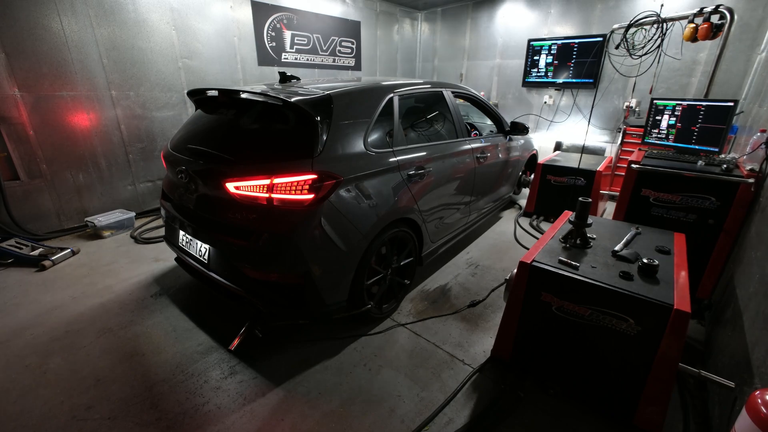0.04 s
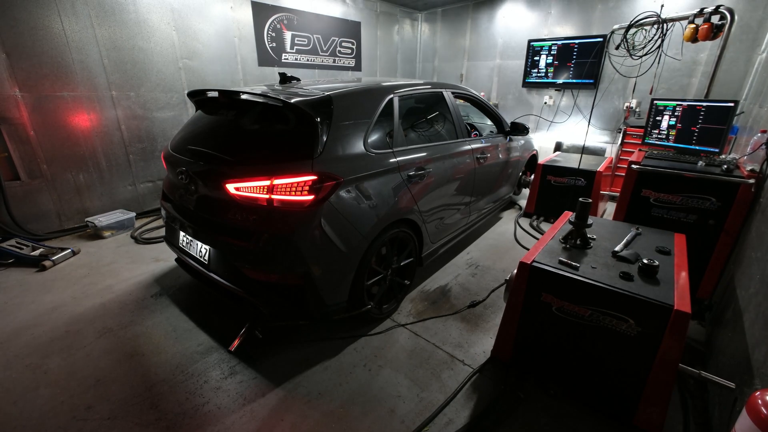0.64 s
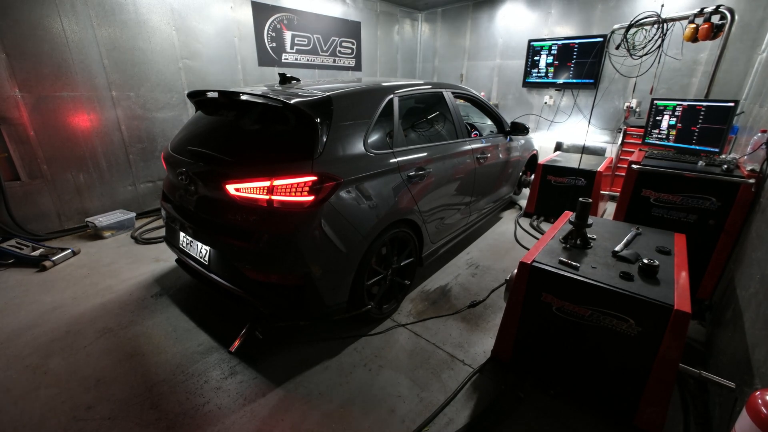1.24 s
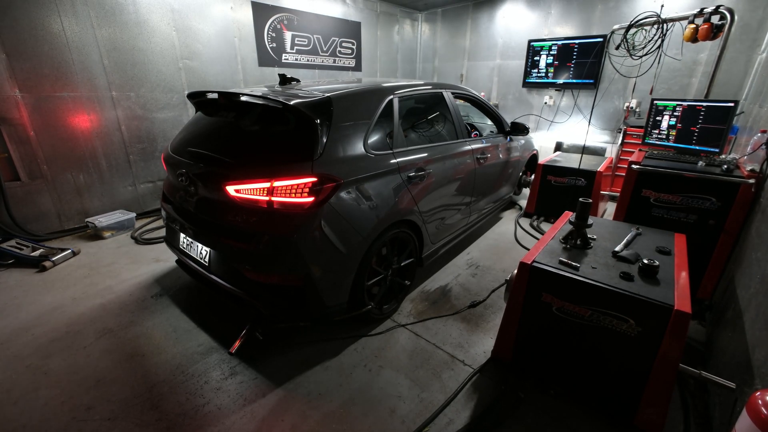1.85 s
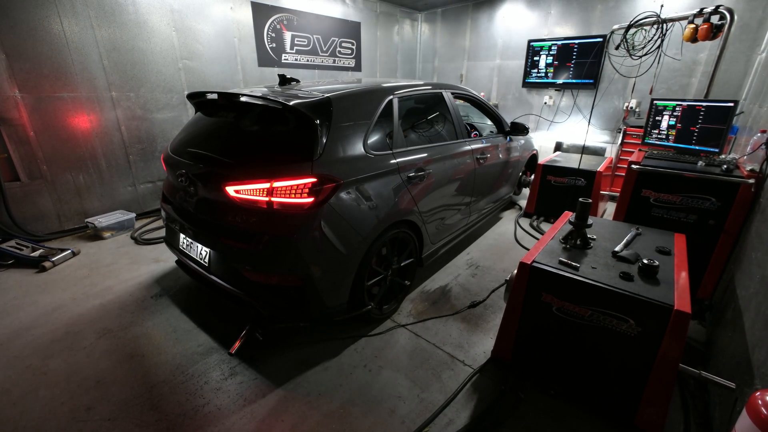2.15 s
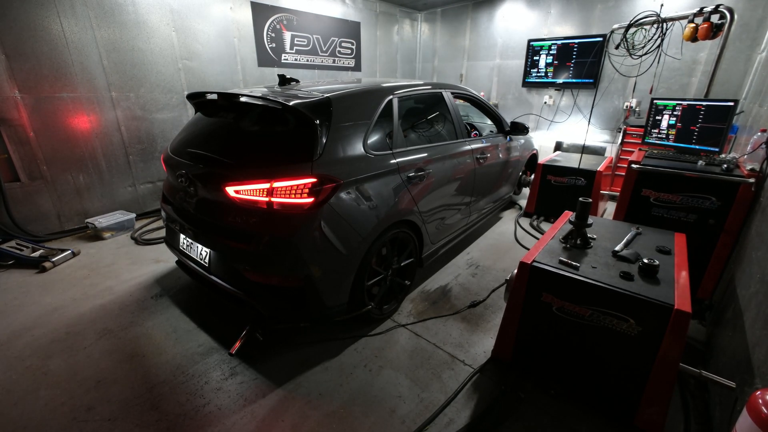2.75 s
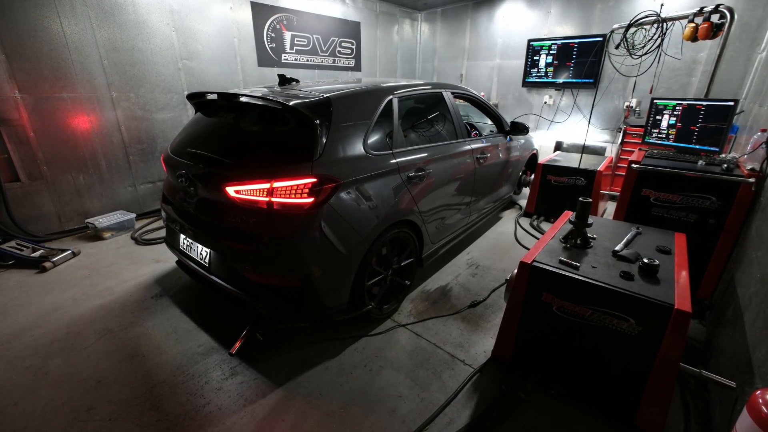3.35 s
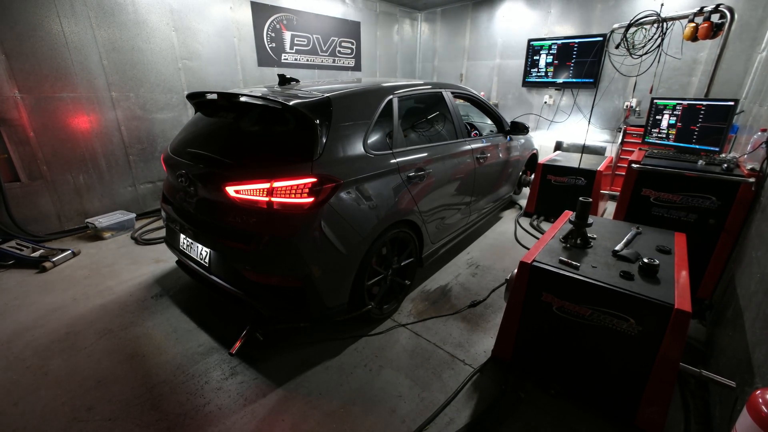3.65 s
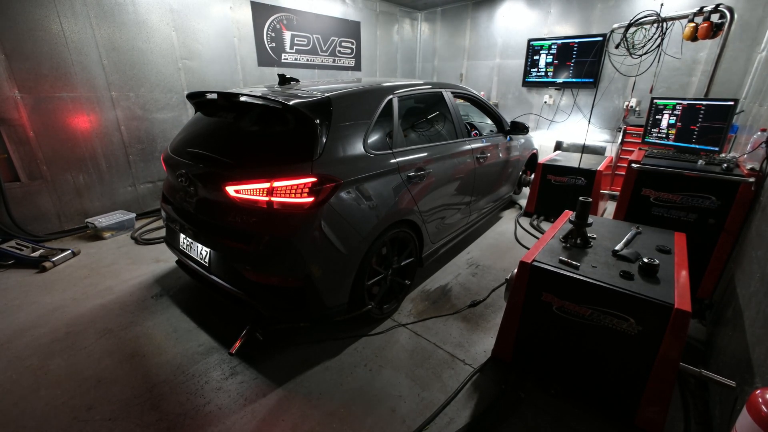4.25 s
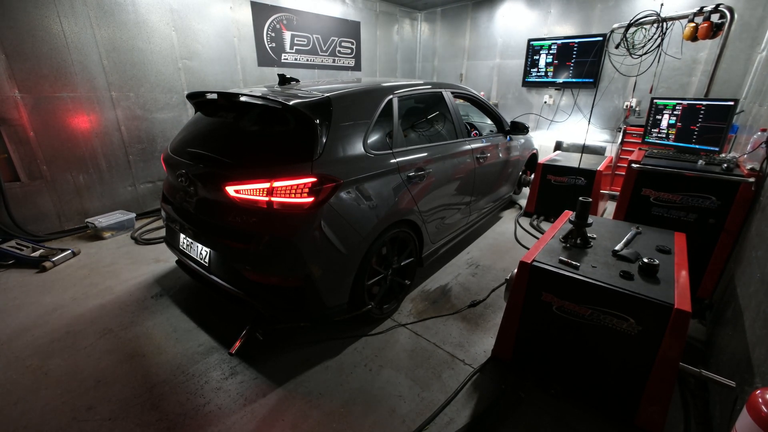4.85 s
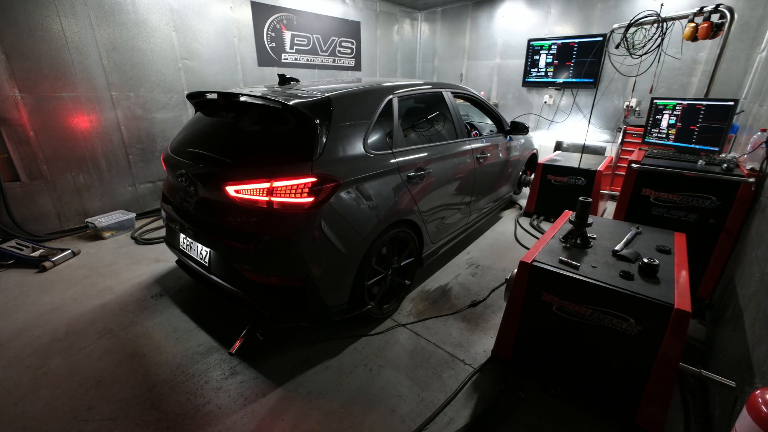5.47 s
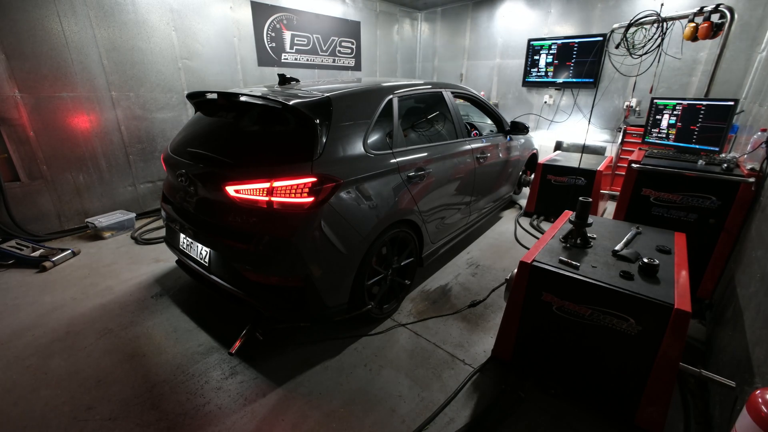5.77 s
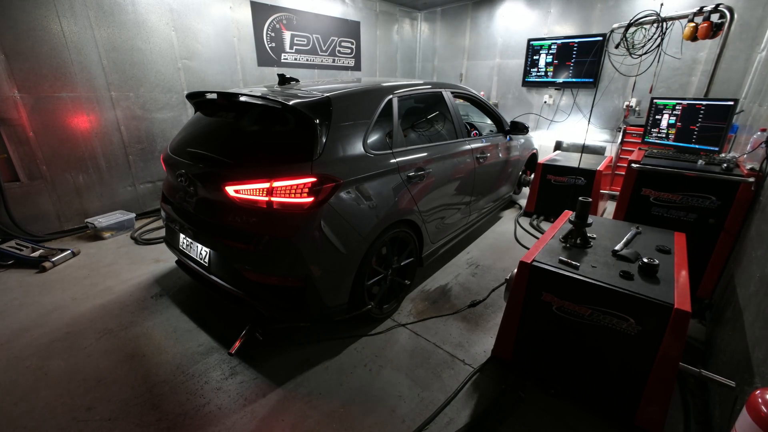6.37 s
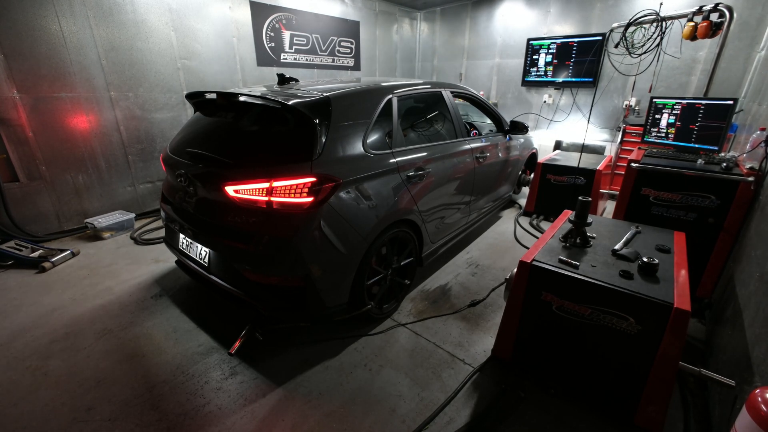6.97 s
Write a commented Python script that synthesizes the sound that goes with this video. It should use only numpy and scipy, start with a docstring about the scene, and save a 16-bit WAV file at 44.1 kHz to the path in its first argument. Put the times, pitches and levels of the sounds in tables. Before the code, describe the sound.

A turbocharged four-cylinder car runs under load on test rollers in a hard-walled workshop. It first lugs at low revs with a barking, rasping exhaust, then climbs slowly and evenly in pitch, getting louder. The exhaust pulses merge into a rushing roar with hiss on top, swelling slightly three times near the end. A faint blower rushes underneath, and the sound is close with a short room echo.

```python
"""A turbocharged four-cylinder car runs on test rollers in a hard-walled workshop, over a faint blower.
At first the engine lugs at low revs; each firing spits a burst of gas that barks and rasps.
The turbo builds boost (extra air pressure), and the revs climb slowly, sweeping the engine's tones
through the resonances of exhaust and room. As boost and revs rise, the bursts merge into a steady rush
with a hiss on top. Late on, the crankshaft booms faintly, then the roar swells briefly three times."""
import sys
import numpy as np
from scipy import signal
from scipy.fft import rfft, irfft
from scipy.io import wavfile
from scipy.ndimage import uniform_filter1d

SR = 44100
rng = np.random.default_rng(int(sys.argv[2]) if len(sys.argv) > 2 else 0)


def file_out(sig):
    """Save sig as 16-bit WAV at sys.argv[1]."""
    # one column per channel
    cols = np.atleast_2d(sig).T
    # limit, then scale
    lim = np.clip(cols, -1, 1)
    pcm = np.round(lim * 32767).astype(np.int16)
    wavfile.write(sys.argv[1], SR, pcm)


N = 317961


def undb(db):
    """Turn decibels into a factor to multiply a sound by."""
    return np.exp(np.asarray(db) * (np.log(10) / 20))


def unit(x):
    """Scale a signal to an average strength (rms) of 1."""
    return x / np.sqrt(np.mean(x ** 2))


def curve(table):
    """Join (time, value) points by straight lines, one value per sample."""
    times, values = np.transpose(table)
    return np.interp(np.arange(N) / SR, times, values)


def wander(rate_hz):
    """A smooth random drift with a spread of 1."""
    hold = max(int(SR / rate_hz), 1)
    steps = np.repeat(rng.standard_normal(N // hold + 1), hold)
    return unit(uniform_filter1d(uniform_filter1d(steps, hold), hold)[:N])


def response_db(spectrum, hz):
    """Read a level between (frequency, level) points, with octaves evenly spaced."""
    point_hz, db = np.transpose(spectrum)
    return np.interp(np.log(np.maximum(hz, 1)), np.log(point_hz), db)


def ringing_filter(spectrum, size=4096):
    """Gain and phase of a filter with this spectrum that rings after a sound, never before it."""
    cepstrum = irfft(response_db(spectrum, np.fft.rfftfreq(size, 1 / SR)) * np.log(10) / 20)
    cepstrum[1:size // 2] *= 2
    cepstrum[size // 2 + 1:] = 0
    return np.exp(rfft(cepstrum))


def colour(x, spectrum):
    """Pass a sound through a ringing filter."""
    return signal.fftconvolve(x, irfft(ringing_filter(spectrum)))[:N]


def octaves(firing_hz):
    """How many octaves the revs are above 110 firings a second."""
    return np.log2(firing_hz / 110)


def effort_db(firing_hz, boost, base_db, boost_db, octave_db):
    """A layer grows with boost and revs; base_db holds at full boost and 110 firings a second."""
    return base_db - boost_db * (1 - boost) + octave_db * octaves(firing_hz)


def standing_waves_db(hz):
    """Sound bouncing between the walls lifts or weakens a tone at certain pitches."""
    # the workshop's standing waves: f/Hz, half width/Hz, level/dB
    waves = [(108.4, 11, 3), (112.4, 2.4, -3.5), (124.9, 6.7, 5), (146.7, 7.7, 4), (186.2, 6.3, -4),
             (276, 19, 2), (291, 4.3, -2.5), (385.5, 12.6, 3), (454, 6.2, 2.5), (532, 18, 4)]
    return sum(db * np.exp(-((hz - centre) / width) ** 2) for centre, width, db in waves)


def engine_note(firing_hz, firings, boost, waver_db, waver_radians, spread):
    """Tones at multiples (orders) of the firing rate swell and fade as they cross the resonances."""
    # the engine's tones: multiple of the firing rate, level/dB
    orders = [(1, 0), (1.5, -7), (2, 0), (2.5, 0), (3, .5), (3.5, -1), (4, -1), (4.5, -.5), (5, -6),
              (6, -6), (7, -1)]
    # how exhaust and room respond to them: f/Hz, level/dB
    resonances = [(88, 5), (125, 5), (165, 2), (190, -10), (225, -2), (272, 4.5), (295, -6), (335, 0),
                  (375, -.5), (425, -8.5), (455, -7.5), (497, -19), (530, -15), (590, -31), (630, -18),
                  (655, -28), (695, -16), (760, -30)]
    response = ringing_filter(resonances, size=65536)
    response_hz = np.linspace(0, SR / 2, len(response))
    response = response * undb(standing_waves_db(response_hz))
    note = 0
    for order, db in orders:
        if order == 1:
            drive_db = effort_db(firing_hz, boost, base_db=-30.5, boost_db=11, octave_db=7.5)
        elif order == 2:
            drive_db = effort_db(firing_hz, boost, base_db=-28, boost_db=14, octave_db=4.5)
        elif order % 1:  # half orders come from unequal cylinders
            drive_db = effort_db(firing_hz, boost, base_db=-38.5, boost_db=16, octave_db=13.5)
        else:
            drive_db = effort_db(firing_hz, boost, base_db=-30, boost_db=8.5, octave_db=4.5)
        soften_db = 3.5 * np.clip(order - 3, 0, 2) * (1 - boost)  # less boost, softer pulse
        # the silencer holds the higher orders back, which spreads each pulse over its cycle
        cycles = order * firings - spread * (order - 1) ** 2
        phase = 2 * np.pi * cycles + waver_radians * order * wander(14)
        tone = np.interp(order * firing_hz, response_hz, response) * np.exp(1j * phase)
        level_db = db + drive_db - soften_db + waver_db * order * wander(13)
        note = note - undb(level_db) * tone.real
    return note


def bursts(firings, steady, excess_db, scatter_db, length, crack):
    """Each firing is a crack and a dying puff over a steady jet; one cylinder in four gets excess_db."""
    index, progress = firings.astype(int), firings % 1
    size = undb(scatter_db * rng.standard_normal(N // 100)[index] + excess_db * (index % 4 == 1))
    puff = unit(progress * np.exp(-progress / length))  # length: share of the time between firings
    onset = unit(np.diff(index, prepend=0).astype(float))
    jet_share = np.clip(steady, .01, .99)
    gas = np.sqrt(jet_share + (1 - jet_share) * (size * puff) ** 2) * rng.standard_normal(N)
    flow = gas - crack * (1 - jet_share) ** 4 * size * onset  # the crack drowns as the jet grows
    return flow / np.sqrt(uniform_filter1d(flow ** 2, size=SR // 6))  # even out slow level changes


def workshop(x, echo_db, decay_s, apart_hz):
    """Direct sound plus a dense echo off the walls, unlike in left and right above apart_hz."""
    t = np.arange(SR // 2) / SR
    mid, side = rng.standard_normal((2, len(t))) * undb(-60 * t / decay_s) * (t > .004)
    side = signal.sosfilt(signal.butter(1, apart_hz, "high", fs=SR, output="sos"), side)
    echoes = undb(echo_db) * np.array([mid + side, mid - side]) / np.sqrt(np.sum(mid ** 2))
    return unit(x + signal.fftconvolve(x[None], echoes, axes=1)[:, :N])


def silencer_bark(firings, steady, excess_db):
    """Short, sharp bursts of gas bark in the silencer."""
    # spectrum of the bark: f/Hz, level/dB
    bark = [(400, -33.5), (590, -42.5), (655, -15), (692, -8), (735, -7.5), (770, -2), (815, 0),
            (850, -0.5), (890, 0.5), (965, -1), (1020, -2), (1100, -9), (1160, -8.5), (1400, -21),
            (2000, -68)]
    knocks = bursts(firings, steady, excess_db, scatter_db=.8, length=.12, crack=4.2)
    return workshop(colour(knocks, bark), echo_db=-9.5, decay_s=0.13, apart_hz=1100)


def tailpipe_rasp(firing_hz, firings, steady, excess_db):
    """Long puffs rasp at the tailpipe and sharp ones make it ring; the rasp gains as the revs rise."""
    # spectrum of the rasping gas: f/Hz, level/dB
    rasp_spectrum = [(800, -24), (1220, -1.5), (1500, -4), (1800, -0.5), (2100, -0.5), (2350, -6.5),
                     (2750, -2.5), (3100, -9.5), (3400, -8), (3950, -12), (4700, -16), (7000, -24.5),
                     (9000, -36.5), (15000, -63)]
    # spectrum of the ringing pipe: f/Hz, level/dB
    ring_spectrum = [(1200, -36.5), (1850, -22.5), (2050, 0.5), (2150, 1), (2260, -6.5), (2450, -8.5),
                     (4000, -54), (9000, -65)]
    puffs = bursts(firings, steady, .5 * excess_db, scatter_db=2.1, length=0.35, crack=0.21)
    knocks = bursts(firings, steady, 1.1 * excess_db, scatter_db=1.3, length=0.095, crack=1.9)
    rasp = unit(colour(puffs, rasp_spectrum))
    ring = unit(colour(knocks, ring_spectrum))
    ring_gain = undb(-3 - 6 * octaves(firing_hz))
    pipe = (rasp + ring_gain * ring) / np.hypot(1, ring_gain)
    return workshop(pipe, echo_db=-9.5, decay_s=0.72, apart_hz=1520)


def jet_hiss(firings, steady):
    """The gas jet hisses; this arrives from all walls, so left and right are mostly unlike."""
    # spectrum of the hiss: f/Hz, level/dB
    hiss = [(3000, -16.5), (5000, -0.5), (5700, -1.5), (7100, 1.5), (7700, 1), (8350, 1), (9200, -0.5),
            (10000, -1.5), (10700, 2), (11600, 1.5), (13300, -2.5), (14300, 0.5), (15800, -4.5)]
    shared, left, right = (
        colour(bursts(firings, steady + 0.09, excess_db=0, scatter_db=2.5, length=0.17, crack=0), hiss)
        for _ in range(3))
    return unit(0.23 * shared + np.array([left, right]))


def gas_rumble():
    """Swirling gas makes a low rumble."""
    # spectrum of the rumble: f/Hz, level/dB
    rumble = [(25, -43), (48, -34), (75, -9.5), (125, 0.5), (160, -6.5), (185, -6), (220, -6.5), (275, 1.5),
              (300, -1.5), (385, 2), (470, 0.5), (590, -7), (700, -5), (1000, -42.5)]
    return unit(colour(rng.standard_normal(N), rumble))


def exhaust_gas(firing_hz, firings, boost):
    """The escaping gas barks, rasps, hisses and rumbles, growing louder with boost and revs."""
    # steady share of the flow: revs and boost fill the gaps between the bursts
    steady = 0.47 + 0.44 * octaves(firing_hz) - 0.11 * (1 - boost)
    # one cylinder stands out while the engine lugs, below 100 Hz, and hardly at all above 105 Hz
    excess_db = np.interp(firing_hz, [100, 105], [5.5, .8])
    bark_db = effort_db(firing_hz, boost, base_db=-32.5, boost_db=9.5, octave_db=8)
    rasp_db = effort_db(firing_hz, boost, base_db=-34.5, boost_db=15.5, octave_db=15)
    hiss_db = effort_db(firing_hz, boost, base_db=-52.5, boost_db=22.5, octave_db=20.5)
    rumble_db = effort_db(firing_hz, boost, base_db=-41.5, boost_db=15.5, octave_db=9.5)
    bark = undb(bark_db) * silencer_bark(firings, steady, excess_db)
    rasp = undb(rasp_db) * tailpipe_rasp(firing_hz, firings, steady, excess_db)
    hiss = undb(hiss_db) * jet_hiss(firings, steady)
    rumble = undb(rumble_db) * gas_rumble()
    return undb(roar_swell_db()) * (bark + rasp) + hiss + rumble


def cooling_fan(db):
    """The low, even rush of the blower in front of the car."""
    # spectrum of the blown air: f/Hz, level/dB
    rush = [(20, -3), (45, 2), (65, 9), (110, 12), (170, 6), (300, -34), (600, -22), (2000, -14),
            (8000, -44)]
    air = colour(rng.standard_normal(N), rush)
    return undb(db) * workshop(air, echo_db=-19, decay_s=0.83, apart_hz=900)


def crank_boom(firing_hz, firings, resonance_hz, half_width_hz, db):
    """The crankshaft turns once for two firings; its shake booms while it crosses a low resonance."""
    nearness = np.exp(-((firing_hz / 2 - resonance_hz) / half_width_hz) ** 2)
    strength = undb(db + 2 * wander(8.7)) * nearness
    return strength * np.sin(np.pi * firings + .5 * wander(8))


def roar_swell_db():
    """The roar grows briefly louder three times at high revs."""
    # the swells: t/s, half length/s, added level/dB
    swells = [(5.162, .05, 2.5), (5.4, .14, 1.8), (5.99, .06, 2)]
    t = np.arange(N) / SR
    return sum(db * np.exp(-((t - peak_s) / half_s) ** 2) for peak_s, half_s, db in swells)


def scene():
    """Engine note, exhaust gas and crankshaft follow the revs, over the steady blower."""
    # engine speed as a firing rate, four firings to an engine cycle: t/s, f/Hz
    speed = [(0.0, 97.1), (0.2, 91.47), (0.55, 89.03), (0.97, 88.6), (1.37, 92.93), (1.85, 107),
             (2.85, 117.7), (3.55, 131.6), (3.9, 137), (4.3, 145.7), (4.7, 152.7), (5.4, 163.7),
             (6.3, 176.5), (6.75, 183.35), (7.21, 184.3)]
    # the turbo spins up, overshoots, is caught by its relief valve and tapers off at high revs:
    # t/s, boost/share of its peak
    turbo = [(0.0, 0.09), (0.25, 0.18), (1.2, 0.69), (1.68, 0.75), (1.87, 1.0), (2.1, 0.8), (2.22, 0.96),
             (3.3, 0.79), (7.21, 0.66)]
    firing_hz, boost = curve(speed), curve(turbo)
    firings = np.cumsum(firing_hz) / SR  # running count
    note = engine_note(firing_hz, firings, boost, waver_db=0.27, waver_radians=0.11, spread=0.2238)
    boom = crank_boom(firing_hz, firings, resonance_hz=76.5, half_width_hz=5.5, db=-53)
    return note + exhaust_gas(firing_hz, firings, boost) + cooling_fan(db=-54.0) + boom


def record(dry):
    """Two close microphones, each with its own tone, the right one slightly late; the top is cut."""
    # how much louder the left side is than the right: f/Hz, level/dB
    balance = [(30, 0), (80, -.3), (120, -1), (200, 0), (270, 1.5), (380, 2.2), (700, 1.5), (1300, 2),
               (2200, -.7), (2950, -3.5), (3400, .5), (6500, 2.5), (8500, 7.5), (15000, 3.5)]
    right_lag_ms, top_hz = 0.078, 15900
    hz = np.fft.rfftfreq(2 * N, 1 / SR)
    lean_db = response_db(balance, hz) / 2
    delay = np.exp(-2j * np.pi * hz * right_lag_ms / 1000)
    microphones = np.array([undb(lean_db), undb(-lean_db) * delay])
    faded = dry * signal.windows.tukey(N, .002)
    heard = irfft(rfft(faded, 2 * N) * microphones)[:, :N]
    return signal.sosfilt(signal.ellip(12, .2, 80, top_hz, fs=SR, output="sos"), heard)


dry = scene()
out = record(dry)
file_out(out)
```